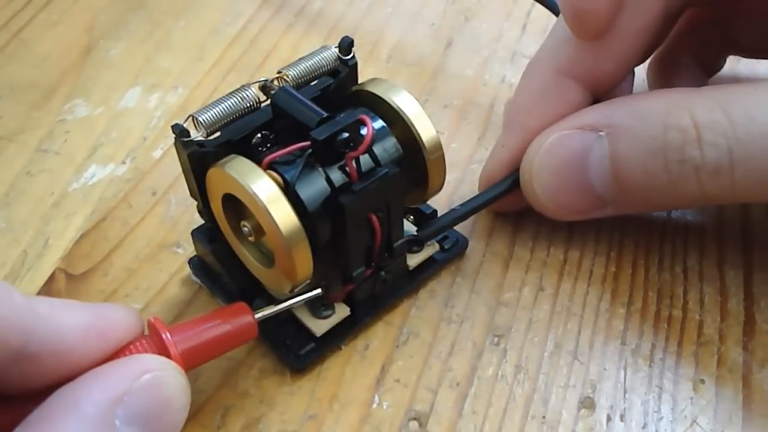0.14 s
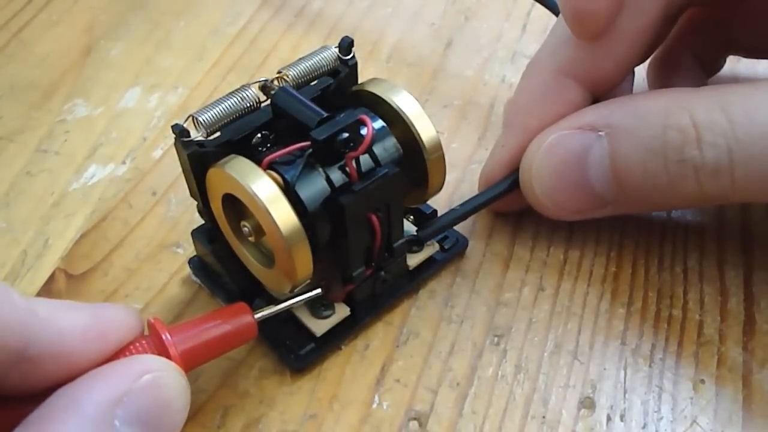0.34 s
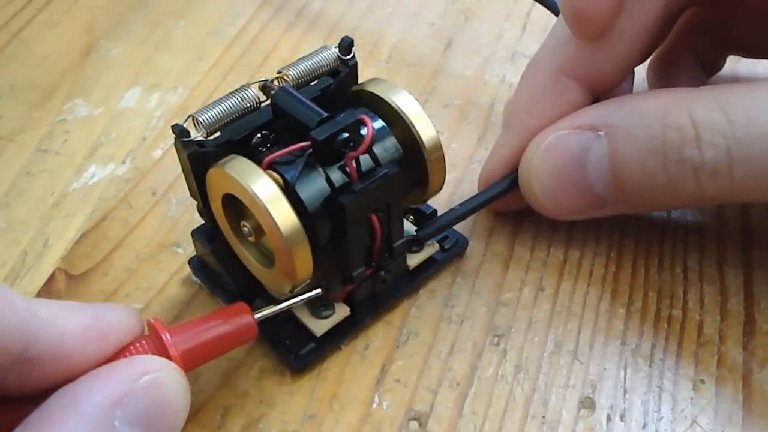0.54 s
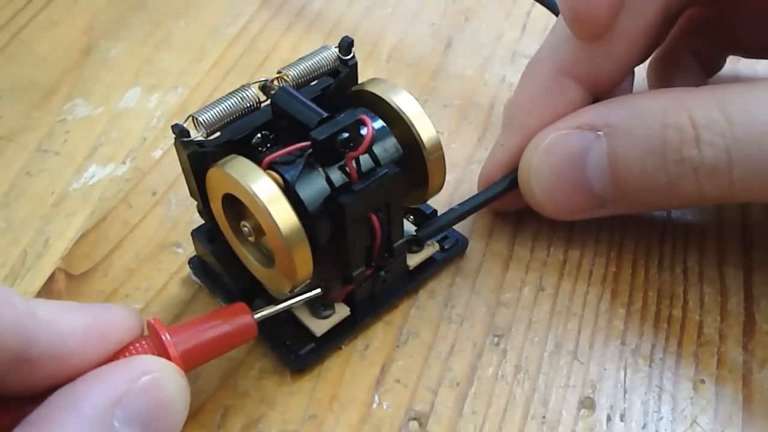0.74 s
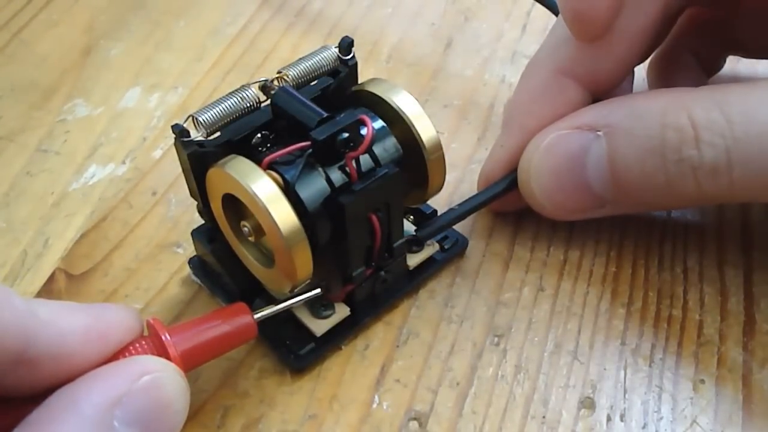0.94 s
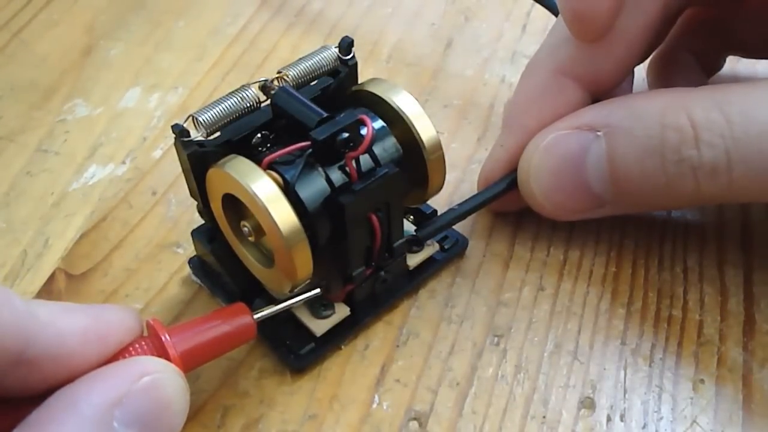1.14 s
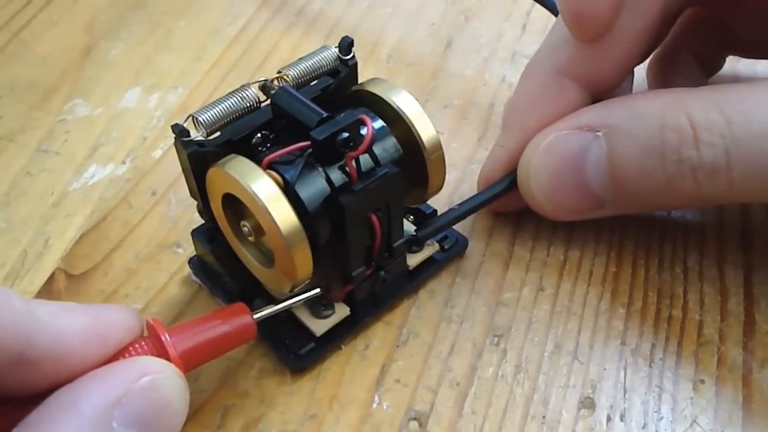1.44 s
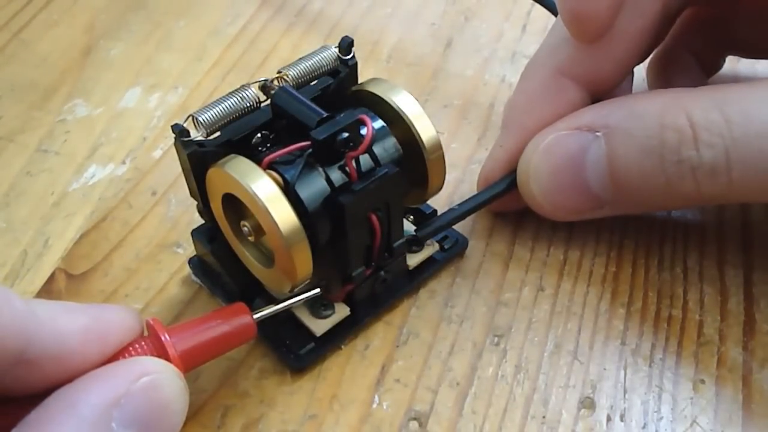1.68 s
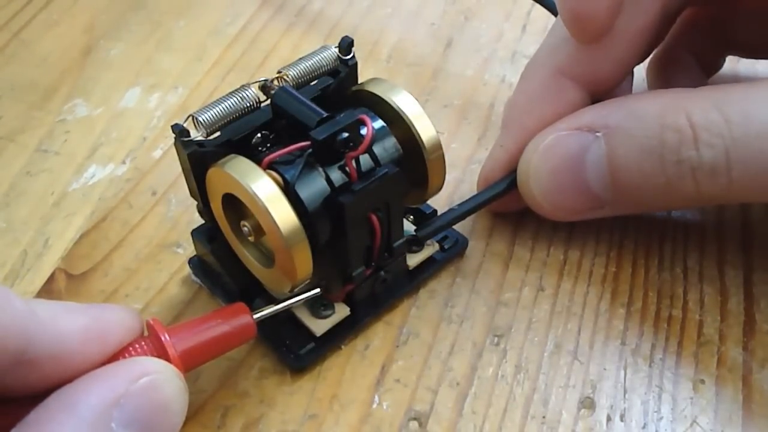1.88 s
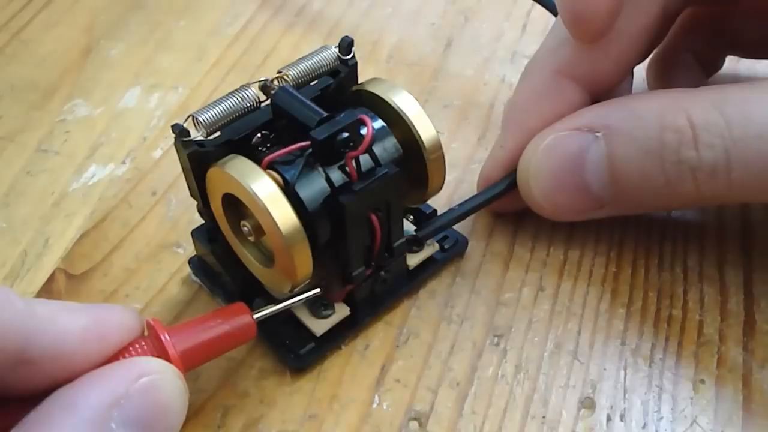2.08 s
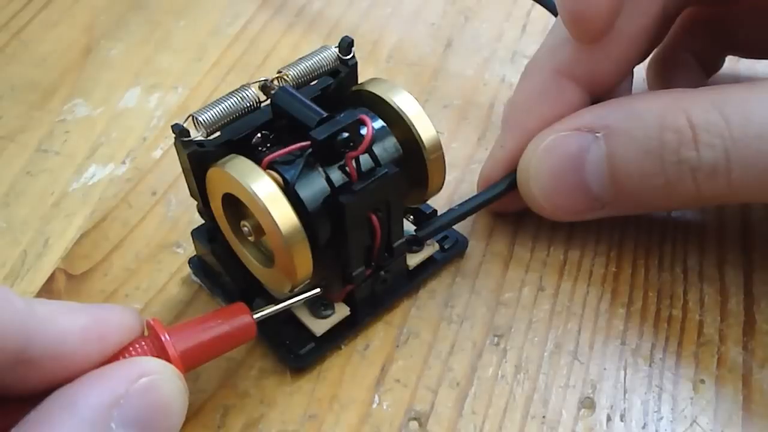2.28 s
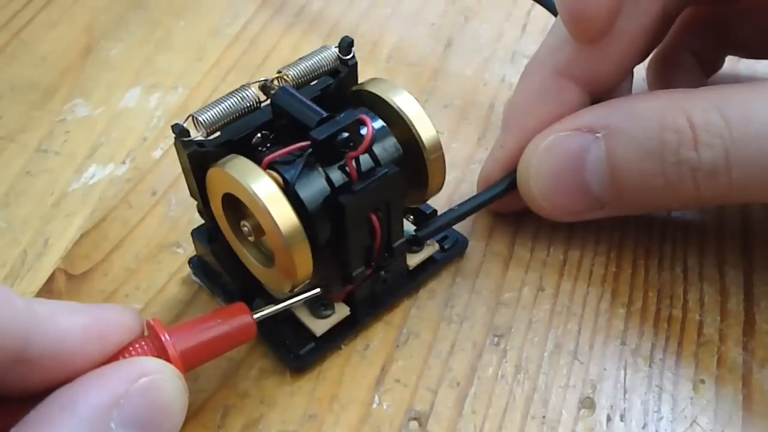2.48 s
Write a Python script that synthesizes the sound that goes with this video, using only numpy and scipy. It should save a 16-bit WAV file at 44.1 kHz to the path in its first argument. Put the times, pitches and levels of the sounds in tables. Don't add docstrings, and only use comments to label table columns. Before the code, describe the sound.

A small electric motor whirrs throughout, very close, on a wooden table in a quiet room. At 0 s a brief burst of bright metallic chatter drops away quickly; the whining pitch climbs rapidly, then more slowly. Gears buzz, brushes rasp and flywheels ring thinly, with rougher chatter around 0.5-0.7 s and 1.8-2.1 s. By 2.6 s the speed nearly levels and the gear buzz, chatter and table hum soften.

```python
import sys
import numpy as np
from scipy import signal
from scipy.fft import rfft, irfft, next_fast_len
from scipy.io import wavfile
from scipy.ndimage import map_coordinates

SR = 44100
rng = np.random.default_rng(int(sys.argv[2]) if len(sys.argv) > 2 else 0)


def inscribe(sig):
    pcm = np.round(np.clip(np.atleast_2d(sig).T, -1, 1) * 32767)
    wavfile.write(sys.argv[1], SR, pcm.astype(np.int16))


def boost(x):
    u = np.asarray(x, float) / 20
    return 10 ** u


N = 115542

MESH, WHEEL = 13 / 6, 13 / 18


def unit(x):
    return x / np.sqrt(np.mean(x ** 2) + 1e-20)


def curves(rows):
    s, *columns = np.transpose(rows)
    return [np.interp(np.arange(N) / SR, s, column) for column in columns]


def wobble(rate):
    return map_coordinates(rng.standard_normal(N // 32), [np.arange(N) * rate / SR])


def random_phase():
    return rng.uniform(0, 2 * np.pi)


def filtered(x, response):
    m = next_fast_len(N + SR // 4)
    return irfft(rfft(x, m) * response(np.fft.rfftfreq(m, 1 / SR)), m)[:N]


def along(points):
    hz, db = np.transpose(points)
    return lambda f: boost(np.interp(np.log(f + 1), np.log(hz), db))


def body(x, modes):
    def response(f):
        power = 0
        for centre, width, db in modes:
            damping = (f * width) ** 2
            resonance = damping / ((centre * centre - f * f) ** 2 + damping)
            power = power + (boost(db) * resonance) ** 2
        return np.sqrt(power)
    return filtered(x, response)


def drifting(x, centre_hz, width_hz):
    carrier = np.exp(2j * np.pi * np.cumsum(centre_hz) / SR)
    pole = np.exp(-np.pi * width_hz / SR)
    smoothed = signal.lfilter([1], [1, -2 * pole, pole ** 2], x / carrier)
    return unit(np.real(carrier * smoothed))


# time in seconds, shaft speed in turns per second.
SPEED = [(0.0, 164.4), (0.24, 175.4), (0.48, 192.4), (0.71, 207.0), (0.95, 220.8), (1.19, 232.0),
         (1.43, 241.4), (1.67, 249.1), (1.91, 256.0), (2.14, 261.8), (2.38, 267.6), (2.62, 272.3)]


def speed():
    return curves(SPEED)[0]


def firmness():
    return speed() / 250


def shaft():
    return 2 * np.pi * np.cumsum(speed()) / SR


def rattle(beats, lumps_db, swell_db):
    firm = firmness()
    pulse_db = 0
    for multiple, depth_db in beats:
        depth = depth_db * (firm + .15 * wobble(5))
        pulse_db = pulse_db + depth * np.cos(multiple * shaft() + random_phase())
    level_db = pulse_db + lumps_db * wobble(900) + swell_db * wobble(14)
    return unit(rng.standard_normal(N) * boost(level_db))


def taps(multiple, scatter_s, scatter_db):
    at = np.flatnonzero(np.diff(np.floor(multiple * shaft() / (2 * np.pi))))
    chance = rng.standard_normal((len(at), 2))
    late = np.round(scatter_s * SR * chance[:, 0]).astype(int)
    where = np.clip(at + late, 0, N - 1)
    return unit(np.bincount(where, boost(scatter_db * chance[:, 1]), N))


# time in seconds, flywheel chatter in dB, flywheel ring in Hz,
# gear load in dB, coupling to the table in dB.
CONTACT = [(0, -17.5, 6080, -31, 3.5), (.05, -26.5, 6190, -33, -1), (.27, -23, 6160, -30, 3.5),
           (.42, -21.5, 6270, -29, 2), (.49, -19.5, 6080, -27.5, 1.5), (.65, -18.5, 6190, -29.5, -0.5),
           (.76, -22, 6040, -30, -0.5), (.9, -22, 6150, -30, 2), (1.15, -21.5, 6130, -30.5, 0),
           (1.33, -21, 6280, -31.5, 0), (1.37, -24, 6110, -31.5, 1), (1.65, -27.5, 6170, -32.5, 1),
           (1.8, -26, 6200, -31.5, 1.5), (1.83, -20, 6030, -33.5, 0.5), (2.0, -18.5, 6140, -32.5, 0),
           (2.15, -20.5, 6190, -34.5, -4), (2.38, -21, 6225, -34.5, -2), (2.62, -25.5, 6180, -37.5, -3.5)]


def contact():
    return curves(CONTACT)


# frequency in Hz, spectral density in dB per Hz.
ROOM = [(15, -48), (25, -20), (54, -25), (102, -2.5), (193, -13), (249, -24), (400, -3.5), (520, -30),
        (880, -120)]


def room():
    return boost(-67.5) * unit(filtered(rng.standard_normal(N), along(ROOM)))


# multiple of shaft speed in sixths, level in dB.
ORDERS = [(6, 0), (10, -24), (12, 3.5), (13, -1.5), (14, -11), (16, -13.5), (18, -1.5), (20, -5), (24, -5),
          (26, -2.5), (28, -4.5), (30, -1.5), (31, -11.5), (32, -9.5), (36, -8.5), (39, -3.5), (42, -5.5)]
# frequency in Hz, width in Hz, level in dB.
TABLE = [(162, 28.4, -13.5), (261.6, 52, -8), (410, 61, -6.5), (502.2, 19.6, 2.5), (531.3, 39, -1),
         (578, 43, -3.5), (653, 56, 1), (705, 54, -6.5), (812, 82, -1.5), (920, 57, -3), (1135, 105, -2),
         (1231, 94, -2), (1398, 163, 4), (1542, 122, -1.5)]


def hum():
    tones = 0
    for sixths, db in ORDERS:
        tones = tones + boost(db + 1.1 * wobble(7)) * np.sin(sixths / 6 * shaft() + random_phase())
    broad = [(centre, 2.15 * width, 0.88 * db) for centre, width, db in TABLE]
    rumble = unit(body(rattle([(0.94, 1.3)], lumps_db=1.9, swell_db=1.43), broad))
    coupling_db = contact()[3]
    return boost(coupling_db) * (boost(-46.5) * body(tones, TABLE) + boost(-47) * rumble)


# frequency in Hz, width in Hz, level in dB.
CAN = [(8650, 410, -2), (9480, 240, -3.5), (10530, 220, 1), (10980, 240, -5)]


def commutator():
    wander_db = 2.5
    ticks = 0
    for order in range(30, 68):
        ticks = ticks + boost(wander_db * wobble(6)) * np.sin(order * shaft() + random_phase())
    return boost(-53 + wander_db * wobble(3.52)) * unit(body(ticks, CAN))


# frequency in Hz, spectral density in dB per Hz.
BRUSH = [(4500, -24), (5200, -7.5), (6900, -2), (8300, -8), (10000, -13.5), (10800, -14), (11200, -24)]
# frequency in Hz, width in Hz, level in dB.
WHEELS = [(5300, 350, -5), (5680, 300, 1), (6550, 300, 2), (7150, 120, -1), (7400, 400, -1), (7670, 70, -5),
          (8700, 500, -11), (9400, 500, -14)]
# time in seconds, pressure in dB.
PRESSURE = [
    (0, -3),
    (.1, -2.5),
    (.4, 0),
    (.9, 0.5),
    (1.2, -1),
    (1.5, -1),
    (1.75, 0.5),
    (2.0, -0.5),
    (2.62, -2),
]


def brushes():
    rasp = rattle([(WHEEL, 2.5), (2 * WHEEL, .8)], lumps_db=0.0, swell_db=.5)
    chatter_db = contact()[0]
    level_db = curves(PRESSURE)[0] + 0.17 * (chatter_db - chatter_db.mean())
    scrape = boost(-37) * unit(filtered(rasp, along(BRUSH)))
    ringing = boost(-32.5) * unit(body(rasp, WHEELS))
    return boost(level_db) * (scrape + ringing)


# frequency in Hz, width in Hz, level in dB.
FRAME = [(1925, 414, -18), (2382, 380, -16.5), (2704, 195, -11), (2968, 220, -8.5), (3402, 790, -9.5),
         (3874, 360, -4), (4122, 410, -1), (4463, 220, -5), (4707, 290, -8)]


def gears():
    sliding = rattle([(1, 1.2), (WHEEL, 1.2)], lumps_db=.7, swell_db=.7)
    teeth = boost(-4) * taps(MESH, scatter_s=.00015, scatter_db=3)
    load_db = contact()[2]
    return boost(load_db) * unit(body(sliding + teeth, FRAME))


def flywheels():
    level_db, ring_hz = contact()[:2]
    rolling = rattle([(2 * WHEEL, 1.5), (MESH, 1.8)], lumps_db=.8, swell_db=.4)
    knocks = boost(-4) * firmness() * taps(WHEEL, scatter_s=.0002, scatter_db=2.5)
    strike = rolling + knocks
    upper = drifting(strike, ring_hz, width_hz=460)
    lower = boost(-10.5) * drifting(strike, ring_hz - 435, width_hz=147)
    ring = filtered(upper + lower, lambda f: 1 / (1 + (f / 10600) ** 8))
    return boost(level_db - 3) * ring


def scene():
    return (room() + hum() + commutator() + brushes() + gears() + flywheels())[None]


def top_cut(x):
    return signal.sosfilt(signal.butter(12, 15640, fs=SR, output="sos"), x)


# frequency in Hz, level in dB.
IMAGE = [(12960, -6), (13450, -11), (14500, -18), (15200, -25), (15700, -36)]


def record(dry):
    mirror_hz, bass_cut_hz, top_hz = 12000, 55, 15720
    gap_low_hz, gap_high_hz = 11020, 12980
    kept = filtered(dry[0], lambda f: (f < gap_low_hz) * f ** 2 / (f ** 2 + bass_cut_hz ** 2))
    carrier = np.exp(4j * np.pi * mirror_hz * np.arange(N) / SR)
    flipped = np.real(np.conj(signal.hilbert(kept)) * carrier)
    image = filtered(flipped, lambda f: along(IMAGE)(f) * (f > gap_high_hz) * (f < top_hz))
    return top_cut((kept + image)[None])


dry = scene()
out = record(dry)
inscribe(out)
```